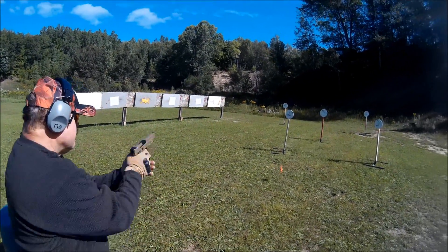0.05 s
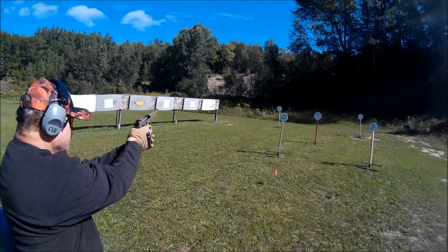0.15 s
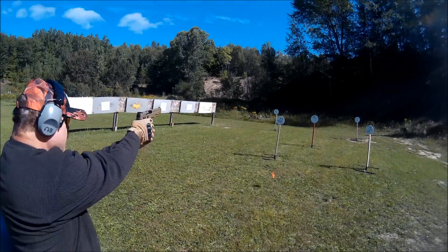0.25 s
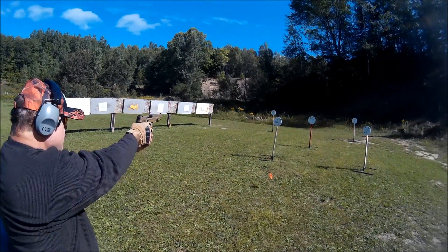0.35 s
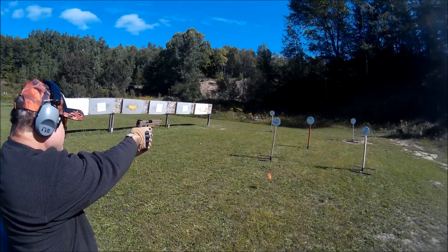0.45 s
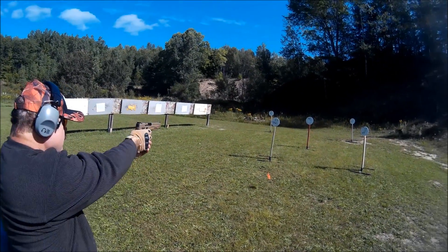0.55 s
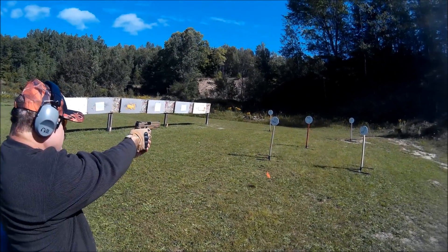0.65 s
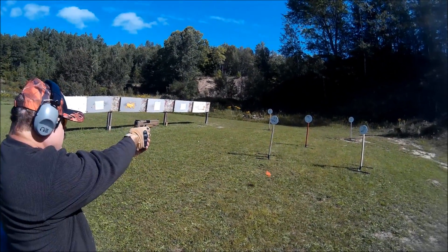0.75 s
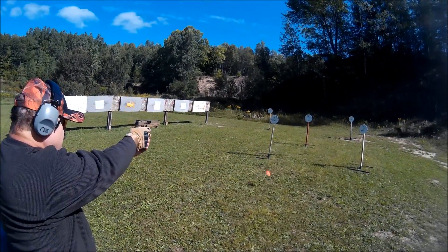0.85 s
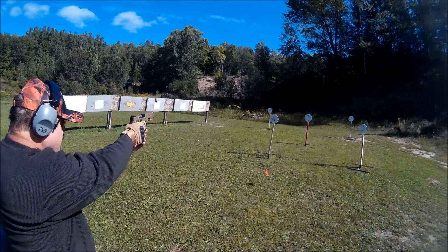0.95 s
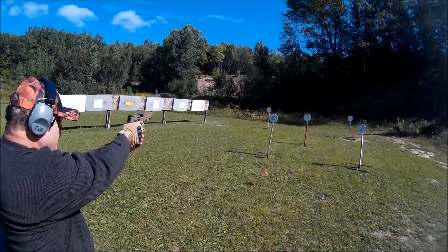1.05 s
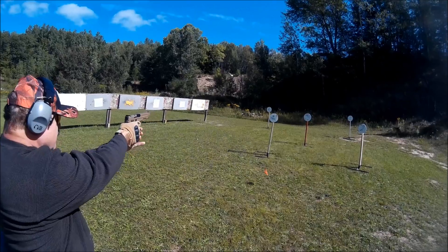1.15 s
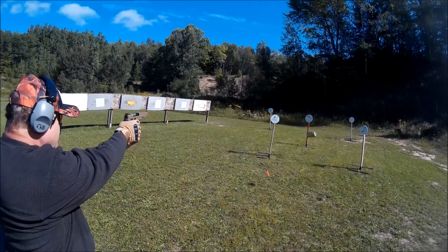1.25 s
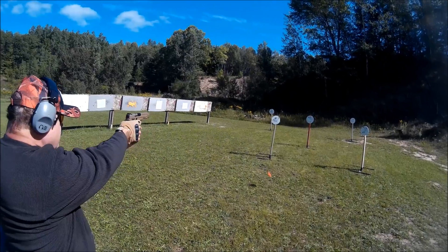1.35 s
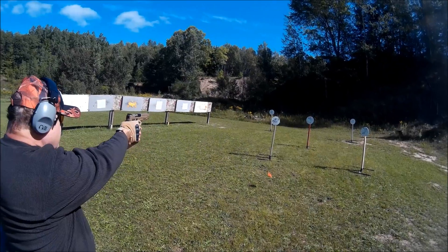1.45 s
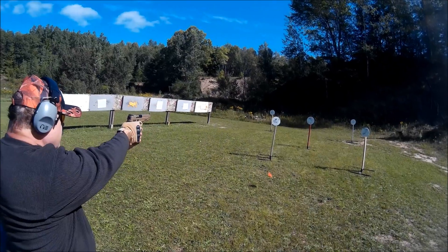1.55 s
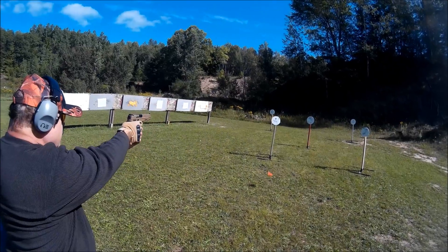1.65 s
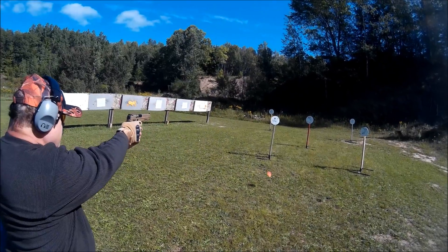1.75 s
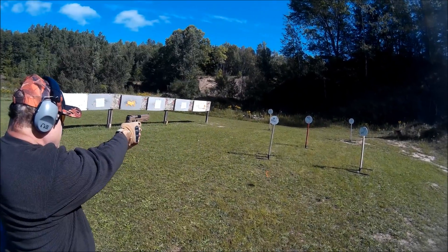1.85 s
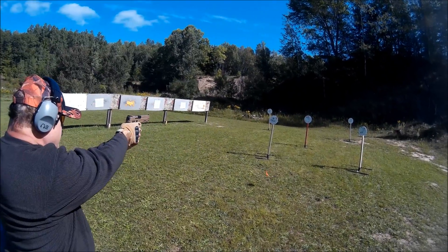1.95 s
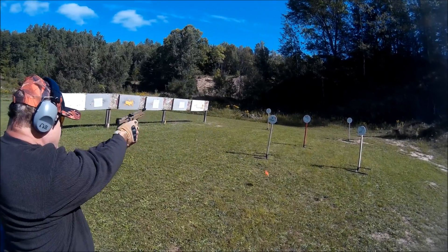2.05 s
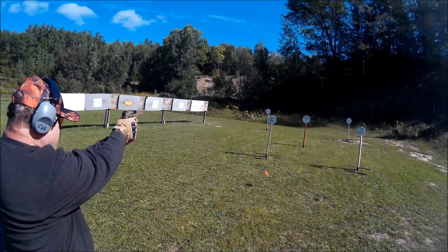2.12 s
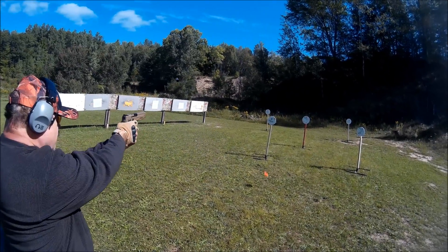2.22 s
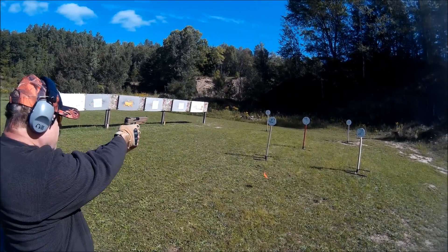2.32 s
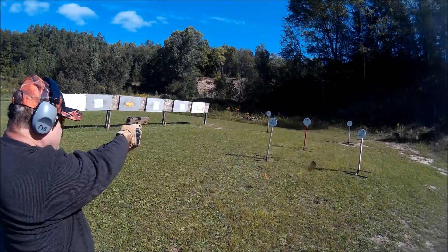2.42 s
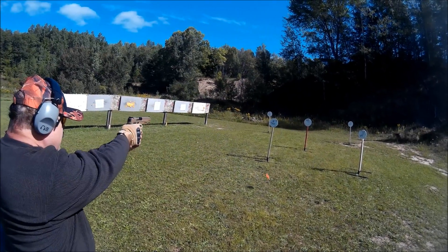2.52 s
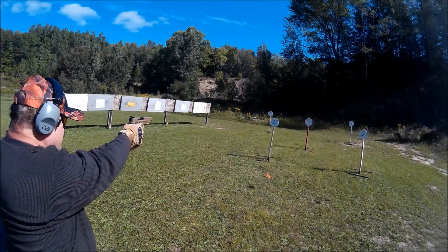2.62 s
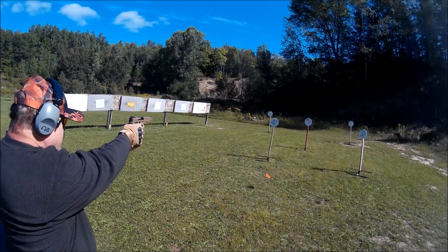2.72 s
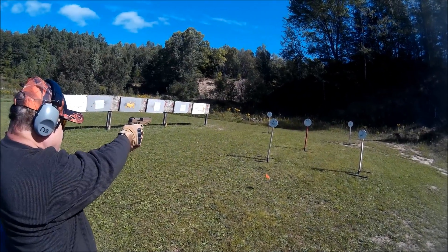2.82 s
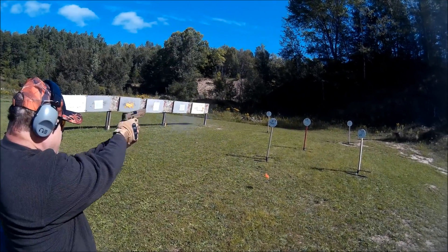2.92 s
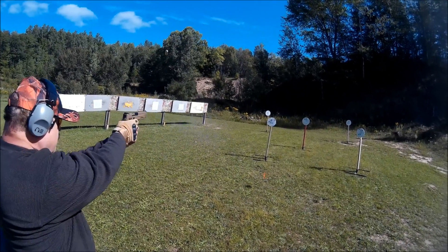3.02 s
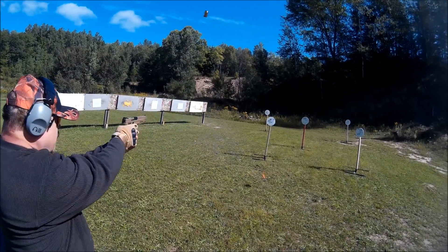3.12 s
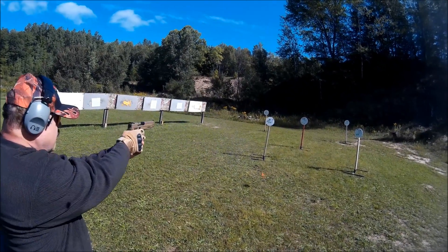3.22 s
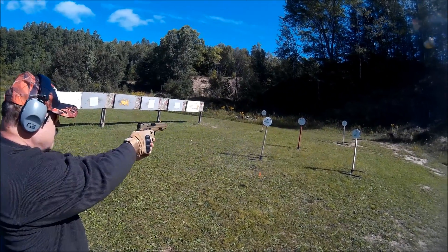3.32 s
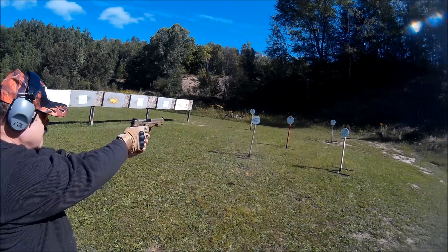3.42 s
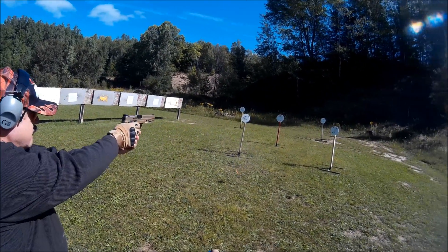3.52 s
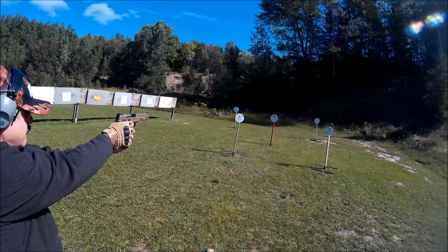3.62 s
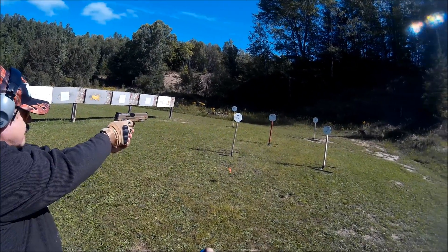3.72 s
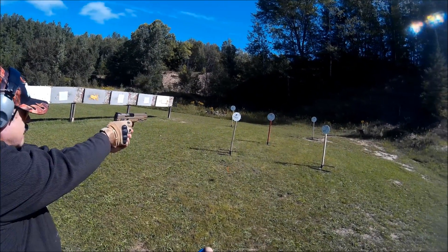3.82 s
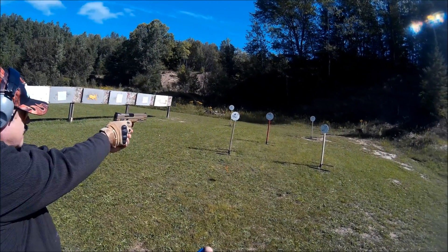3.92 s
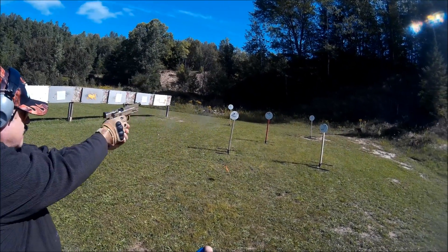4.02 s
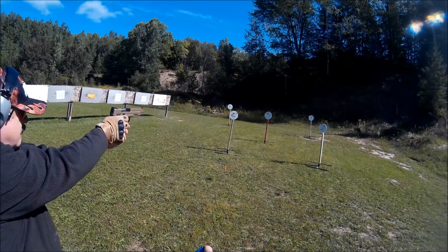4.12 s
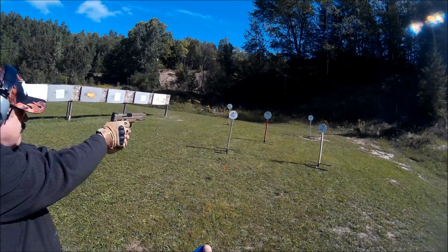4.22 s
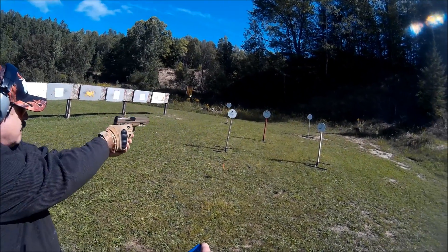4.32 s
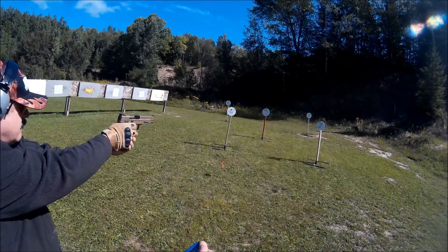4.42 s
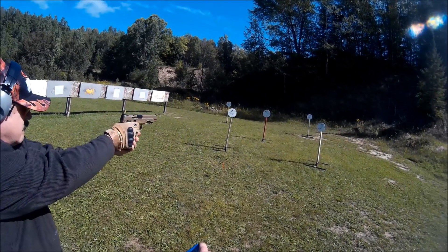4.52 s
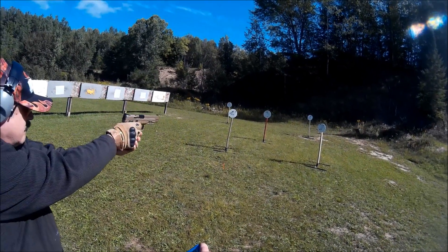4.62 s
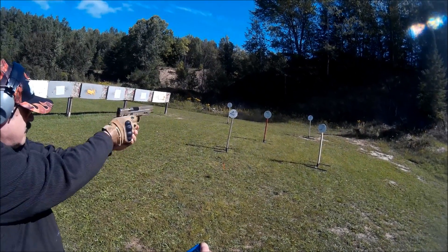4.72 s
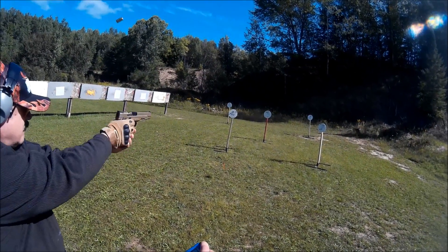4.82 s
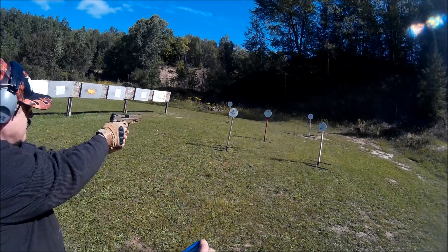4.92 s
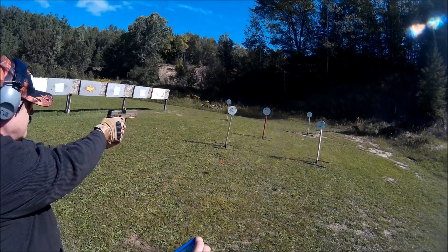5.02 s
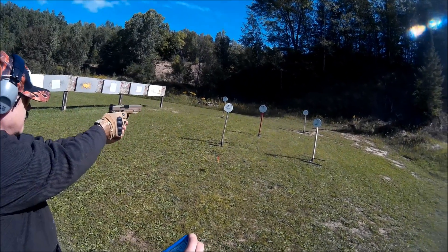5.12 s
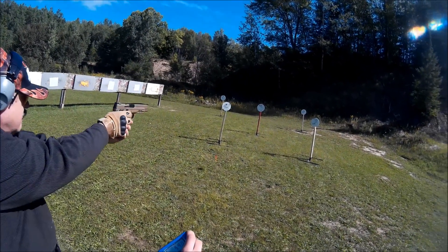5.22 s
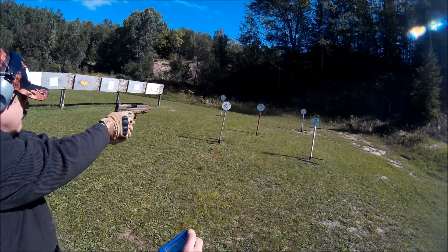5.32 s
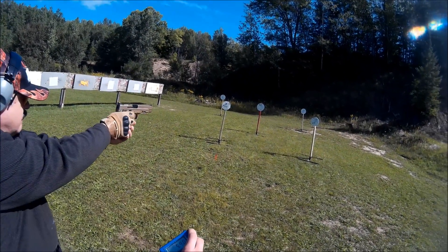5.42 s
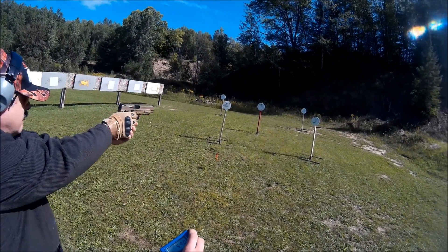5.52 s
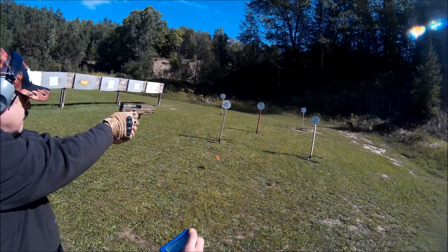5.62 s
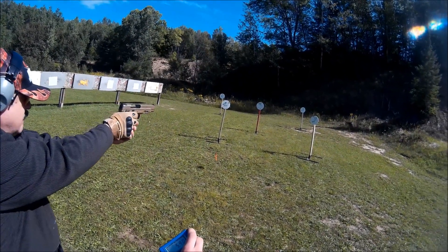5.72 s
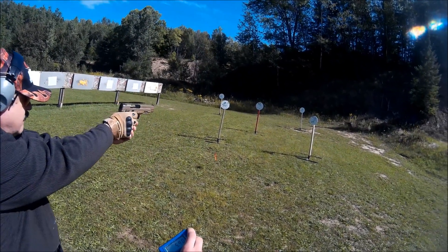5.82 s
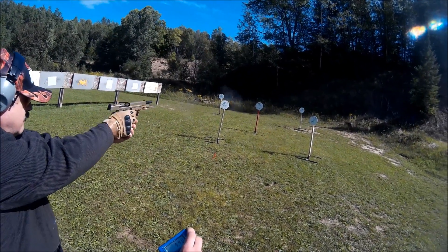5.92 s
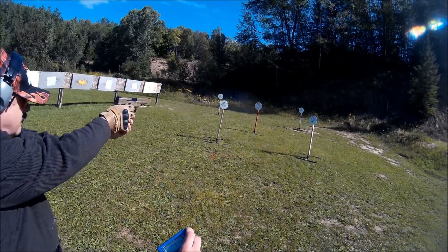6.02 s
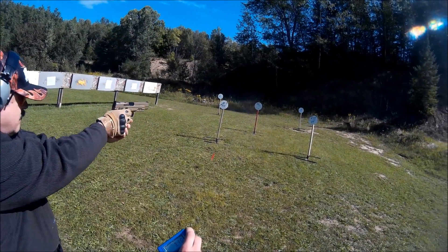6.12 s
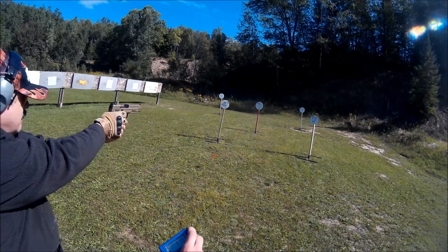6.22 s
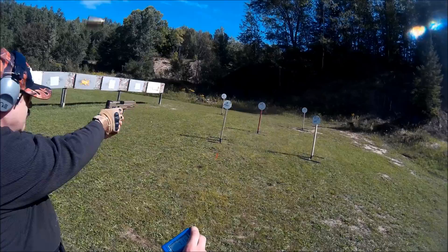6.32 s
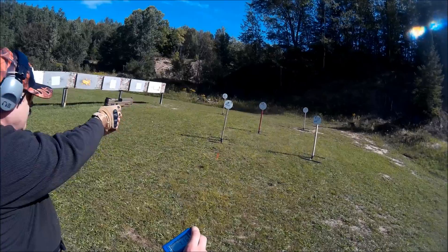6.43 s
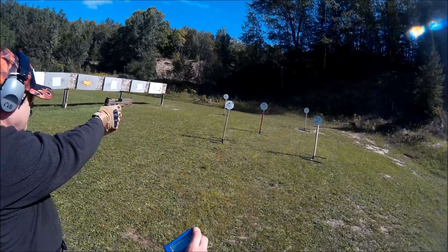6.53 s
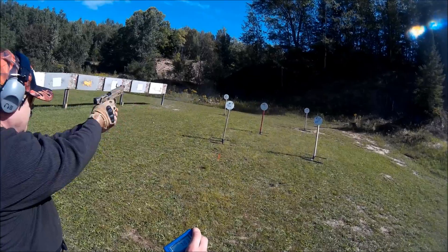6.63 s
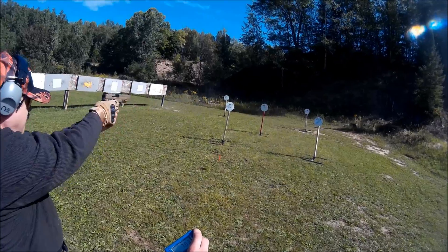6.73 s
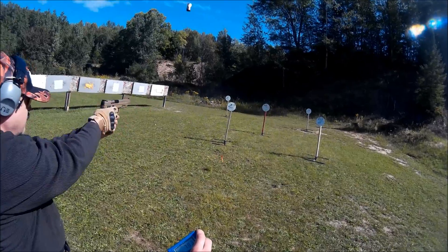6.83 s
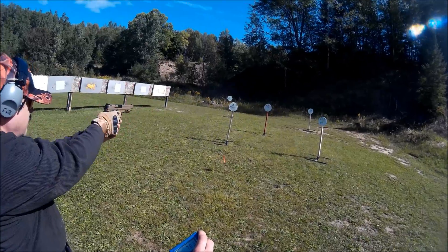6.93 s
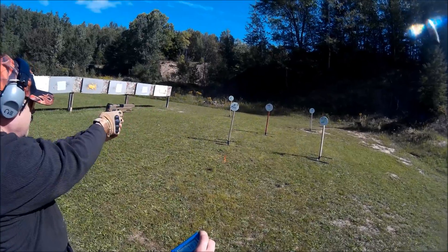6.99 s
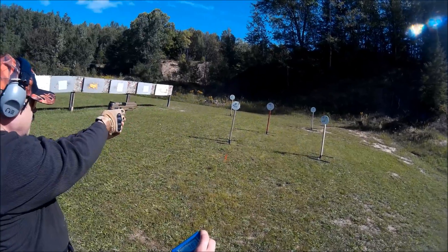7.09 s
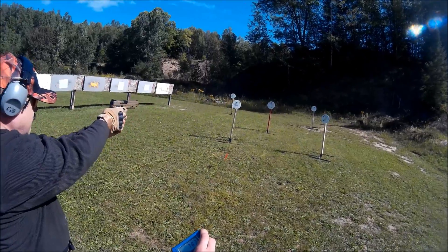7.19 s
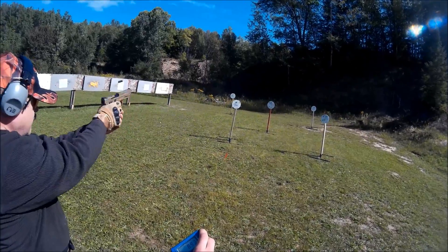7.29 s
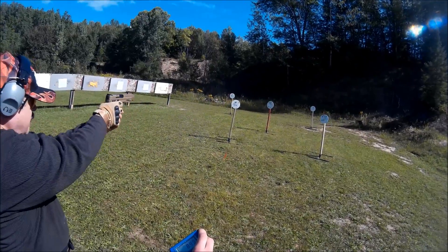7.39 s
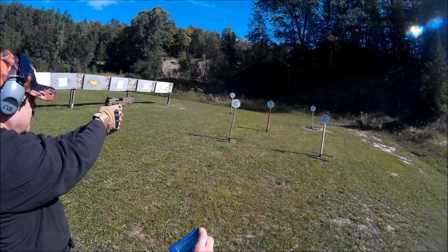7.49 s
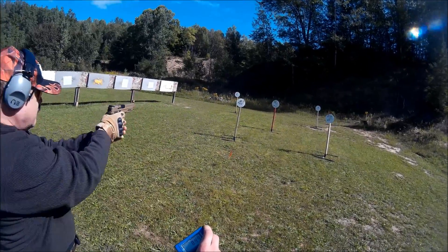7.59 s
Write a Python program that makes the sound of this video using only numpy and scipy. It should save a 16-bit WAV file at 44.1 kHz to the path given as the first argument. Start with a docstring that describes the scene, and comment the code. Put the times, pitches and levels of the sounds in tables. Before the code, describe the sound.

A very faint breeze and hiss in open air hold until 0.86 seconds, when a pistol cracks close to the microphone: a harsh, overloaded snap with a short boom, ground bounce and rapid slapping echoes. A steel plate rings almost at once, deep and clear. At 2.02 a second shot, with a heavy bass thump, brings only echoes and a dry late slap. At 2.85 another blast is followed by a small, higher ping. The shot at 3.96 thumps low, then a wide plate rings. At 4.62 there is no plate, just echoes and a late slap. A shot at 5.89 rings a mid-pitched plate; 6.56 gives strong echoes alone. The last, at 7.22, hits steel with a sharp splash and a bright, quickly choked ring. After each shot the sound ducks and recovers while earth-bank reflections and a dull tree roll fade away.

```python
"""Grass pistol range under open air, the microphone a step from the muzzle: a faint breeze, then eight shots.
Each blast is a shock, a noise crack, a boom and a low bass push, with a bounce off the ground. Field scatter
follows at once; on five shots a steel plate, a bank of paired decaying sines, rings out. Then noise slaps
return from the target stands, three short dry bursts land late after three shots, a swell from the earth bank
and a dull roll from the trees. The recorder ducks, recovers, overloads and turns down whatever falls quiet."""
import sys
import numpy as np
from scipy import signal
from scipy.fft import rfft, irfft
from scipy.io import wavfile

SR = 44100
rng = np.random.default_rng(int(sys.argv[2]) if len(sys.argv) > 2 else 0)


def waveform_to_disk(signal):
    """Save audio, clipped to [-1, 1], as 16-bit WAV at the path in sys.argv[1]."""
    frames = np.transpose(np.atleast_2d(signal))
    scaled = np.clip(frames, -1, 1) * 32767
    samples = np.round(scaled).astype(np.int16)
    wavfile.write(sys.argv[1], SR, samples)


N = 337569

SPAN = 2 ** 16      # samples in one sound event
AGE = np.arange(SPAN) / SR      # s since the event began
HZ = np.fft.rfftfreq(SPAN, 1 / SR)


def from_db(db):
    """Amplitude factor of a level in dB."""
    return 10 ** (np.asarray(db) / 20)


def add(track, s, sound):
    """Mixes a sound into the track from time s on."""
    start = max(round(s * SR), 0)
    track[start:start + len(sound)] += sound[:N - start]


def dying(t60):
    """Envelope that loses 60 dB in t60 seconds."""
    return from_db(-60 * AGE / t60)


def delayed(envelope, s):
    """The same envelope, s seconds later."""
    return np.interp(AGE - s, AGE, envelope, left=0)


def lumps(spread_db, per_s):
    """Random gain that wanders between new values, per_s of them a second."""
    values_db = spread_db * rng.standard_normal(2000)
    return from_db(np.interp(AGE * per_s, np.arange(2000), values_db))


def gains(spectrum, hz):
    """A spectrum read at the given frequencies, with unit power gain."""
    points, db = np.transpose(spectrum)
    gain = from_db(np.interp(np.log(hz + 1), np.log(points), db))
    return gain / np.sqrt(np.mean(gain ** 2))


# Resonances of the recorder's housing: [f/Hz, width/Hz, relative level/dB of power (half as many dB of gain)]
HOUSING_MODES = [(304, 13, -19.5), (806, 330, -11.5), (1109, 33, 2), (1485, 370, 3), (2180, 320, -2),
                 (3320, 29, -10), (3380, 140, -8), (4150, 270, 4.5), (4600, 320, -13.5), (4770, 25, -21)]


def colour(spectrum, housing_db):
    """Causal (minimum-phase) response of a spectrum, with the housing's resonances standing out of it."""
    bumps = sum(from_db(db / 2) / (1 + (2 * (HZ - hz) / width) ** 2) for hz, width, db in HOUSING_MODES)
    gain = gains(spectrum, HZ) * from_db(housing_db * np.minimum(bumps, 1))
    # folding the cepstrum onto positive times makes the phase minimal
    cepstrum = irfft(np.log(gain / np.sqrt(np.mean(gain ** 2))))
    cepstrum[1:SPAN // 2] *= 2
    cepstrum[SPAN // 2 + 1:] = 0
    return np.exp(rfft(cepstrum))


def burst(envelope, response):
    """A crowd of tiny pressure fronts: noise under an envelope, coloured."""
    return irfft(rfft(envelope * rng.standard_normal(SPAN)) * response)


# Spectrum of the open air, before the treble lift: [f/Hz, relative level/dB per Hz]
AIR_SPECTRUM = [(15, -39), (25, 0.5), (102, -6), (248, -6.5), (277, -6.5), (353, -5.5), (415, -7.5),
                (589, -8.5), (674, -9), (793, -11), (2270, -21), (13900, -30.5), (15900, -32)]


def open_air(level_db=-55.5, lift_db=13, lift_hz=450):
    """A light breeze in the trees over a faint hiss: steady noise, lifted toward the treble."""
    hz = np.fft.rfftfreq(N, 1 / SR)
    spectrum = gains(AIR_SPECTRUM, hz) * from_db(level_db + lift_db * hz / (hz + lift_hz))
    return irfft(rfft(rng.standard_normal(N)) * spectrum, N)


# Shots, each with its own bass and echo levels:
# [t/s, bass push level/dB, stand echoes level/dB, bank return level/dB]
SHOTS_FIRED = [(0.8583, -21.5, 1.5, -21.5), (2.0176, 5, 3.5, -16.5), (2.846, -21, 4.5, -16.5),
               (3.9637, 3, 0, -14.5), (4.6224, -23.5, 2, -22), (5.8882, -14, 0, -18.5),
               (6.5586, -18, 8.5, -14), (7.2194, -5, 6, -14)]
# Spectrum of the muzzle blast, also of plate splashes and stand echoes: [f/Hz, relative level/dB per Hz]
BLAST_SPECTRUM = [(88, -49.5), (150, -32), (661, -6), (1100, -1.5), (2130, -1), (2910, -4.5), (3400, -4),
                  (3750, -10.5), (4740, -7.5), (6480, -13), (14400, -29.5), (15900, -51)]


def blasts(blast_db=28.5, shock_db=7, ground_s=0.0076, ground_db=-8, body_db=-22, boom_hz=520, boom_db=8):
    """The muzzle's crack and boom a step away, the crack's bounce off the ground, and a low bass push."""
    out, response = np.zeros(N), colour(BLAST_SPECTRUM, housing_db=6.0)
    # the shock front itself is one clean kick to the housing
    shock = from_db(shock_db) * irfft(response)
    # the ball of gas overshoots and falls back
    boom = from_db(boom_db) * np.sin(2 * np.pi * boom_hz * AGE) * dying(t60=0.034)
    crack = dying(t60=.018)
    bounce = from_db(ground_db) * delayed(crack, ground_s)
    body = from_db(body_db) * dying(t60=0.077)
    envelope = np.sqrt(crack ** 2 + bounce ** 2 + body ** 2)
    for s, push_db, *_ in SHOTS_FIRED:
        blast = from_db(blast_db) * (shock + burst(envelope, response))
        # low bass push under the shot, one-sided, as from lopsided overload
        bass_push = from_db(push_db) * dying(t60=0.18)
        add(out, s, blast + boom + bass_push)
    return out


def travelled(sound, air_hz=4000, treble_t60=.6, treble_db=6):
    """The later an echo arrives, the more treble the air has taken: the treble starts raised, then dies."""
    dull = signal.sosfilt(signal.butter(1, air_hz, fs=SR, output="sos"), sound)
    return dull + (sound - dull) * from_db(treble_db) * dying(treble_t60)


# Spectrum of the field's scatter, also of the three late bursts: [f/Hz, relative level/dB per Hz]
FIELD_SPECTRUM = [(18, -63), (30, -21), (373, -27), (524, -17), (1210, -7), (1500, -2.5), (2000, -6),
                  (2220, -1.5), (2960, -19), (3380, -12.5), (5560, -15.5), (8920, -28), (10200, -27),
                  (15900, -52)]
# Spectrum of the earth bank's return: [f/Hz, relative level/dB per Hz]
BANK_SPECTRUM = [(88, -64.5), (150, -37.5), (1210, -9.5), (1470, -6.5), (2850, -21), (3400, -6),
                 (3680, -16.5), (5540, -14.5), (9020, -32.5), (10100, -26), (15900, -60)]
# Spectrum of the tree line's roll, before the leaves dull it: [f/Hz, relative level/dB per Hz]
TREE_SPECTRUM = [(59, -36), (100, -10), (125, -11.5), (159, -9.5), (906, -13.5), (1460, -6), (3010, -14.5),
                 (3400, -12.5), (3760, -19), (12000, -35.5), (15600, -59), (22000, -120)]


def range_echoes(field_db=-9, bank_delay_s=0.15, bank_rise_s=0.028, bank_t60=0.22,
                 trees_db=-35, trees_rise_s=0.15, leaves_hz=8000):
    """Scatter from the field, a broad return from the earth bank, then a dull roll through the trees."""
    out = np.zeros(N)
    field = colour(FIELD_SPECTRUM, housing_db=-0.5)
    bank = colour(BANK_SPECTRUM, housing_db=4.5)
    trees = colour(TREE_SPECTRUM, housing_db=8.0)
    trees = trees / (1 + (HZ / leaves_hz) ** 4) ** .5      # the leaves swallow the top
    fade = np.minimum(2 * (1 - AGE / AGE[-1]), 1)      # to silence over the event's second half
    roll = (1 - np.exp(-AGE / trees_rise_s)) * dying(t60=3.76) * fade
    after_bank = AGE - bank_delay_s      # s from the return's peak
    swell = np.minimum(np.exp(after_bank / bank_rise_s), from_db(-60 * after_bank / bank_t60))
    for s, *_, bank_db in SHOTS_FIRED:
        # reflections arrive in clumps
        field_lumps, bank_lumps, tree_lumps = lumps(4, per_s=300), lumps(4, per_s=220), lumps(2.5, per_s=70)
        add(out, s, travelled(from_db(field_db) * burst(dying(t60=0.56) * field_lumps, field)))
        add(out, s, from_db(bank_db) * burst(swell * bank_lumps, bank))
        add(out, s, from_db(trees_db) * burst(roll * tree_lumps, trees))
    return out


# Bullets on steel: [t/s, ring level/dB, splash level/dB, brightness/dB per octave, time for the ring's high
# modes to swell/s, time until the swinging plate settles/s, twin mode's strength (0-1), plate name]
STEEL_HITS = [(0.8909, 0, 7.5, 0.5, .003, 0.34, 0.2, "deep"),
              (2.9225, 3, 6.5, -2.5, .002, 0.47, 0.45, "small"),
              (4.0394, -3, 11.5, 1, .06, 0.34, 0.17, "wide"),
              (5.9227, 1.5, 8.5, -1, .002, .8, 0.48, "middle"),
              (7.268, 8, 19, -1.5, .014, 0.14, 0.52, "wide")]
# Modes of each plate, by name: [f/Hz, level/dB before brightness and ring level, t60/s before sustain]
PLATE_MODES = {"deep": [(1252, -8, 1.17), (2838, -16, 0.53), (4087, -30, 0.58), (4681, -28, 0.57),
               (4864, -18, 0.45), (5321, -18, 0.46), (6529, -30, 0.39), (7176, -8, 0.26), (8101, -23, 0.5),
               (9812, -9, 0.23), (9958, -17, 0.28), (10441, -28, 0.25), (11207, -5, 0.29),
               (11691, -15, 0.28), (14460, -26, 0.27)], "middle": [(1798, -14, 0.45), (2881, -8, 0.41),
               (3114, -11, 0.36), (4717, -7, 0.32), (4901, -16, 0.45), (5350, -14, 0.32), (6577, -8, 0.31),
               (7232, -8, 0.24), (8196, -2, 0.25), (8675, -10, 0.27), (9819, -22, 0.32), (10991, -35, 0.41),
               (11278, -34, 0.71), (11773, -38, 0.37)], "small": [(2175, -21, 1.3), (3301, -30, 0.82),
               (3433, -23, 0.42), (4626, -32, 0.86), (5737, -16, 0.35), (6113, -35, 1.3), (6975, -15, 0.29),
               (7775, -32, 0.49), (7946, -27, 0.33), (8340, -29, 0.38), (9052, -22, 0.31),
               (9577, -27, 0.29), (10417, -23, 0.22), (11347, -22, 0.23), (12960, -24, 0.2),
               (13830, -28, 0.25)], "wide": [(880, -19, 0.34), (1998, -16, 0.57), (2180, -19, 0.55),
               (3444, -4, 0.52), (3759, -20, 0.41), (4618, -34, 0.74), (5117, -18, 0.62), (5755, -26, 0.42),
               (6996, -11, 0.39), (7985, -21, 0.3), (8352, -12, 0.25), (9078, -13, 0.24), (10376, -7, 0.22),
               (10471, -20, 0.25), (11073, -16, 0.21), (11345, -23, 0.25), (12931, -26, 0.22),
               (14037, -29, 0.22)]}


def plates(settle_db=11, settle_s=0.053, pivot_hz=3000, twin_share=.0026, sustain=1.047, beam_hz=2400):
    """A bullet splashes on the steel and the disc rings while it swings free; settling on its stand chokes it."""
    out, response = np.zeros(N), colour(BLAST_SPECTRUM, housing_db=-1.5)
    for s, ring_db, splash_db, tilt_db, swell_s, free_s, twin, plate in STEEL_HITS:
        ring = np.zeros(SPAN)
        for hz, db, t60 in PLATE_MODES[plate]:
            # modes come in close pairs that start opposed and beat
            phase = 2 * np.pi * (hz * AGE + rng.random())
            # the twin lies about this share of the pitch higher
            beat_hz = hz * twin_share * rng.uniform(.85, 1.15)
            beat = 2 * np.pi * beat_hz * AGE
            # each flutters at random, as if its reflections mingled
            pair = (np.sin(phase) - twin * np.sin(phase + beat)) * lumps(1.5, per_s=25)
            # knocked askew, the disc swings its face back toward the shooter; only the high modes are beamed
            beamed = hz ** 4 / (hz ** 4 + beam_hz ** 4)
            facing = 1 - beamed * np.exp(-AGE / swell_s)
            mode_gain = from_db(db + tilt_db * np.log2(hz / pivot_hz))
            # the freely hung plate stretches every t60 by the sustain factor
            ring += mode_gain * dying(t60 * sustain) * facing * pair
        choke_db = settle_db * (1 - np.exp(-np.maximum(AGE - free_s, 0) / settle_s))
        splash = from_db(splash_db) * burst(dying(t60=0.017), response)
        add(out, s, from_db(ring_db - choke_db) * ring + splash)
    return out


# Target stands that throw the blast back: [delay t/s, level/dB before each shot's own echo level]
STAND_ROW = [(0.0331, 5), (0.0488, 1), (0.076, -8.5), (.085, -11), (.117, -11), (.146, -14)]


def stand_echoes(air_hz=5000):
    """Every shot comes back from the same row of stands as a run of short, slightly dulled slaps."""
    out = np.zeros(N)
    response = colour(BLAST_SPECTRUM, housing_db=10) / (1 + 1j * HZ / air_hz)
    slap = dying(t60=.02)
    row = sum(from_db(db) * delayed(slap, s) for s, db in STAND_ROW)
    for s, _, stands_db, _ in SHOTS_FIRED:
        add(out, s, from_db(stands_db) * burst(row, response))
    return out


# Three short, dry late bursts: [t/s, level/dB]
LATE_BURSTS = [(2.1865, -3.5), (4.706, -0.5), (6.715, -8.5)]


def late_bursts():
    """After three of the shots, one short, dry noise burst arrives late."""
    out, response = np.zeros(N), colour(FIELD_SPECTRUM, housing_db=-2)
    for s, db in LATE_BURSTS:
        add(out, s, from_db(db) * burst(dying(t60=0.011), response))
    return out


def scene():
    """The open air, the shots, their echoes and the strikes on steel, at one microphone."""
    return (open_air() + blasts() + range_echoes() + plates() + stand_echoes() + late_bursts())[None]


def smooth(x, s):
    """One-pole lag of s seconds."""
    r = np.exp(-1 / (s * SR))
    return signal.lfilter([1 - r], [1, -r], x)


def level_of(x, s):
    """Running level in dB, averaged over about s seconds."""
    return 10 * np.log10(smooth(x ** 2, s) + 1e-12)


def limiter(x, threshold_db=-8, deepest_db=22, release_db_per_s=105, attack_s=0.00093):
    """A loud sound pulls the gain down within milliseconds; it climbs back steadily, so a ring can swell."""
    over = np.clip(level_of(x, s=0.0016) - threshold_db, 0, deepest_db)
    climb = release_db_per_s * np.arange(N) / SR
    # a running maximum against the climb holds each peak, then releases it in a straight line
    reduction_db = np.maximum.accumulate(over + climb, axis=-1) - climb
    return x * from_db(-smooth(reduction_db, attack_s))


def suppressor(x, threshold_db=-30, depth_db=13, bass_hz=150):
    """Whatever sinks under the threshold is turned down further, a dB for each dB; the bass bypasses this."""
    below = level_of(x, s=0.021) - threshold_db
    bass = smooth(x, 1 / (2 * np.pi * bass_hz))
    return bass + (x - bass) * from_db(np.clip(below, -depth_db, 0))


def record(dry, coupling_hz=75, cutoff_hz=15700):
    """The recorder: gain control, hard overload, a gentle bass cut and a steep cut at the top."""
    overloaded = np.clip(suppressor(limiter(dry)), -1, 1)
    coupled = overloaded - smooth(overloaded, 1 / (2 * np.pi * coupling_hz))
    return signal.sosfilt(signal.ellip(10, .1, 70, cutoff_hz, fs=SR, output="sos"), coupled)


dry = scene()
out = record(dry)
waveform_to_disk(out)
```